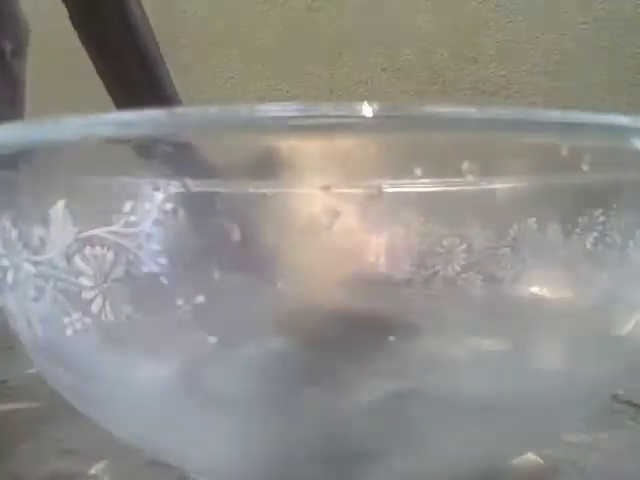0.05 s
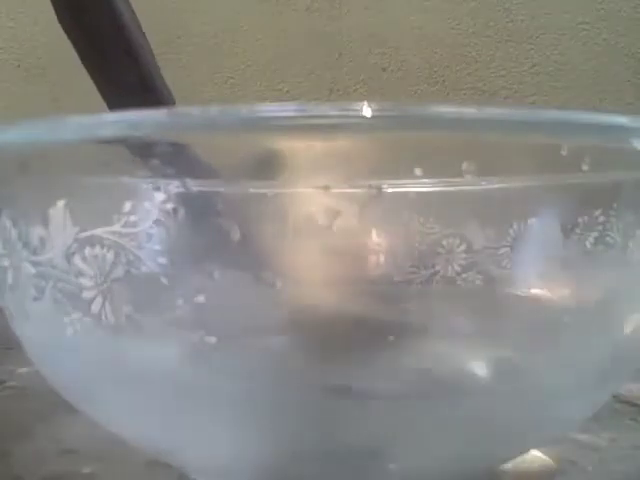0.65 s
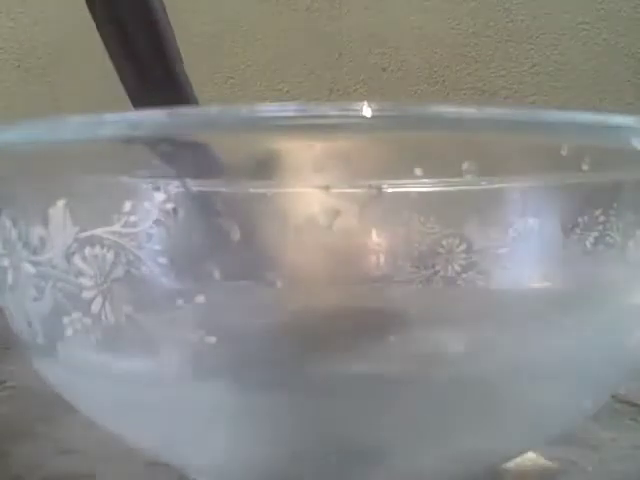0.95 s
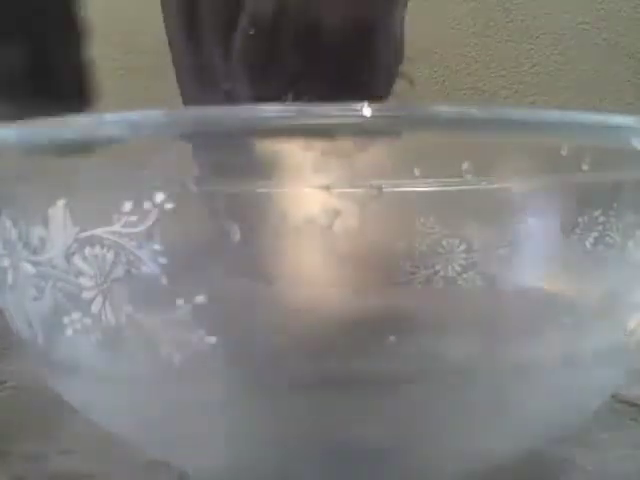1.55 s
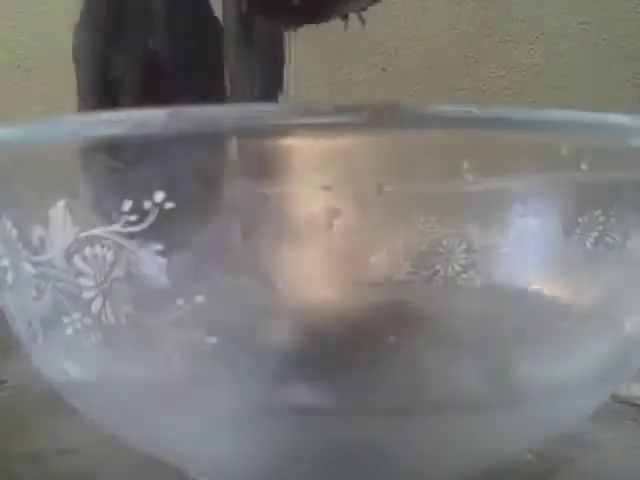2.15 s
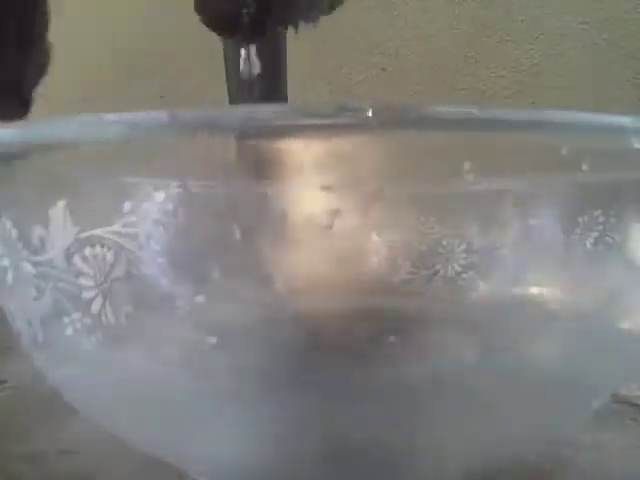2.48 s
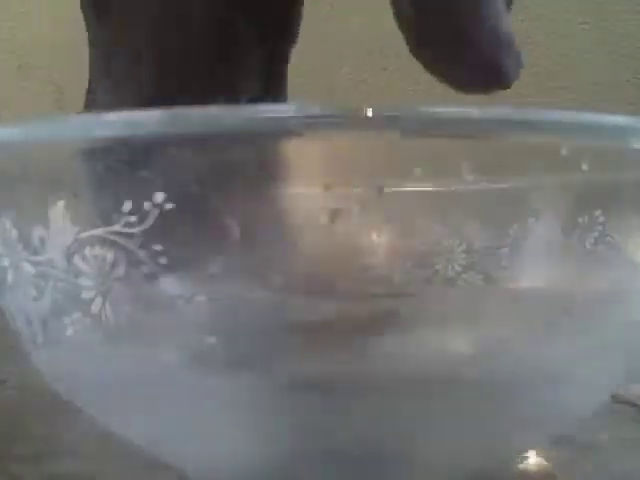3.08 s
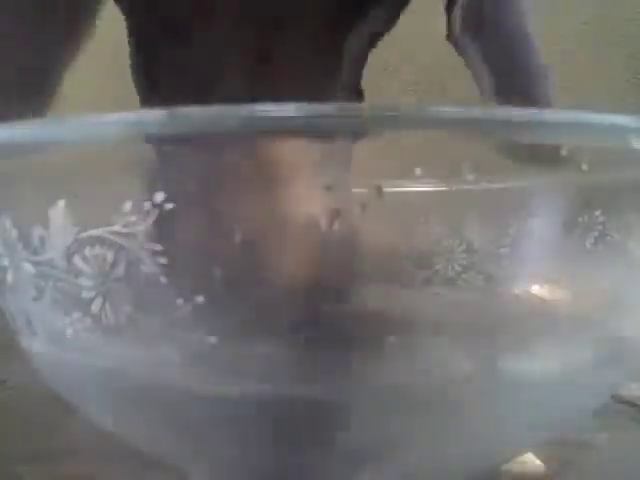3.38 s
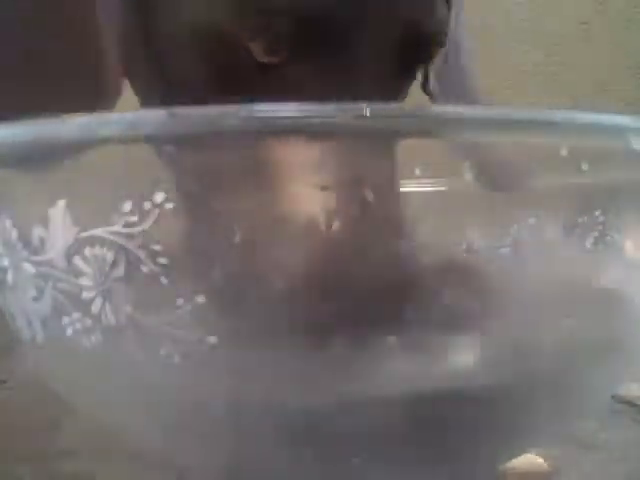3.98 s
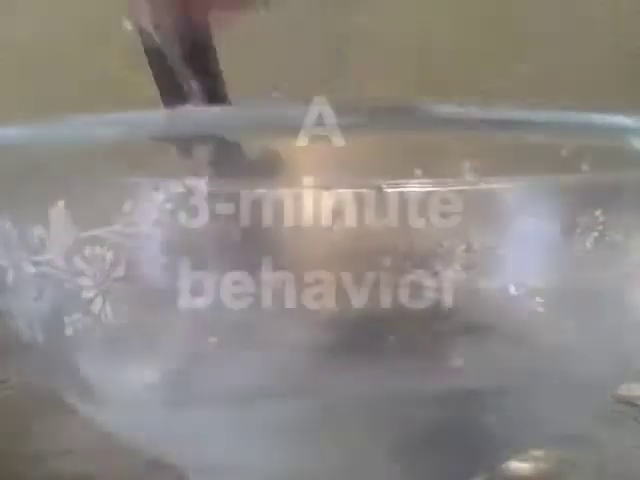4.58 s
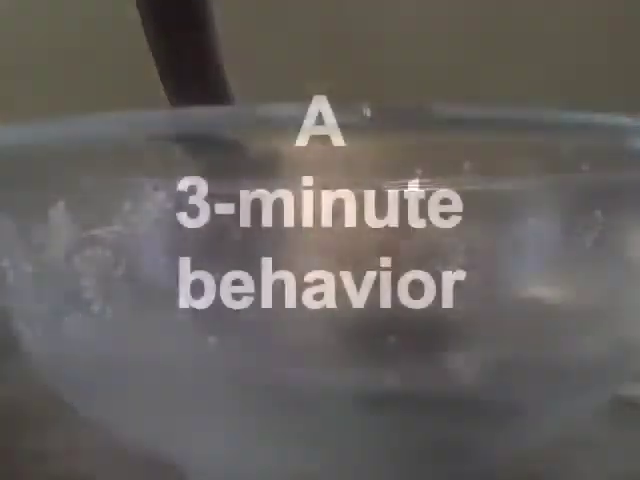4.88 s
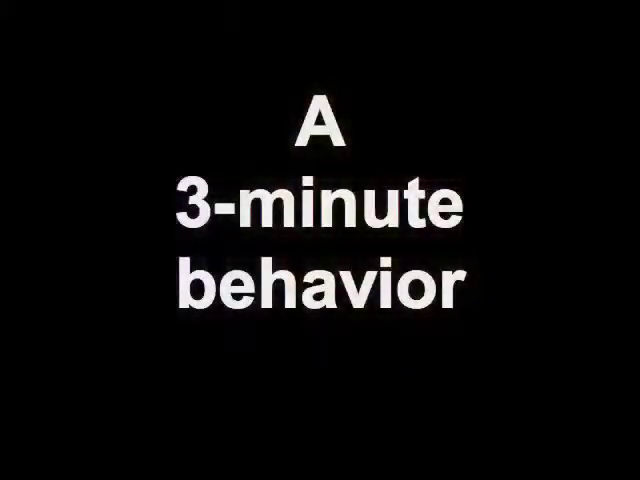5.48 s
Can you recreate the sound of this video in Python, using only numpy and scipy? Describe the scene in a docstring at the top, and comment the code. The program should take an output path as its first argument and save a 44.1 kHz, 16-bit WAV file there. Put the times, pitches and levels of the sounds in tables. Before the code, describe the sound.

A dog blows bubbles and sloshes water in a glass bowl, with knocks and sharp clinks, over a low room hum.

```python
"""Dog at a glass water bowl

A small room, one microphone close to the bowl. A dog dips its muzzle: drips ring as tiny bubbles,
and the water laps and fizzes. It blows a burst of bubbles and knocks the glass, which rings; two
sharp clinks follow. Behind it the room hums and an engine drones far off. All fades out at the end."""
import sys
import numpy as np
from scipy import signal
from scipy.fft import rfft, irfft, next_fast_len
from scipy.io import wavfile
from scipy.ndimage import map_coordinates

SR = 44100
rng = np.random.default_rng(int(sys.argv[2]) if len(sys.argv) > 2 else 0)


def dump(signal):
    """Clip the signal to [-1, 1] and save it as 16-bit WAV at the path in sys.argv[1]."""
    limited = np.clip(np.atleast_2d(signal).T, -1, 1)
    pcm = np.round(limited * 32767).astype(np.int16)
    wavfile.write(sys.argv[1], SR, pcm)


N = 243873
TIME = np.arange(N) / SR
RISE_OCTAVES = 0.069  # upward glide of a small bubble as it rings
KNOCK_OCTAVES = 0.81  # width of the band that a knock excites

# the room's rumble: (frequency [Hz], relative level [dB])
ROOM_SPECTRUM = [(25, -7.5), (45, -1.5), (62, 1.5), (100, -6), (130, -4), (190, -12.5), (290, -20.5),
                 (860, -31), (2200, -40.5), (6500, -48), (9000, -62)]
# the far engine as it reaches the microphone: (time [s], level [dB])
ENGINE_LEVELS = [(.3, -53.5), (1.2, -45.5), (1.7, -50), (2.75, -38), (3.65, -43.5), (3.9, -52), (5, -56.5)]
# the room's reverberation: (frequency [Hz], t60 [s])
WALL_DECAY = [(300, 0.26), (2000, 0.17), (9000, 0.11)]
# water lapping between the dog's moves: (time [s], level [dB])
LAP_LEVELS = [(.45, -60), (.9, -53.5), (1.35, -53), (2.5, -61.5), (3.75, -65.5), (4.6, -62.5), (4.9, -65.5)]
# the dog stirs the water: (time [s], churn [dB], fizz before trim [dB], 20 dB rise [s], 20 dB fall [s])
WATER_STIRS = [(0.178, -38.5, -45.5, 0.06, 0.07), (0.32, -55, -51, 0.28, 0.17),
               (0.675, -48, -57.5, .06, 0.1), (1.0, -54.5, -59, 0.56, 0.5), (1.6, -56, -63, 0.5, 0.42),
               (2.81, -61.5, -60.5, 0.17, 0.17), (4.03, -38.5, -56, 0.0639, 0.05),
               (4.206, -37, -57, .09, 0.13), (4.275, -32, -43, 0.0931, 0.04), (4.46, -60, -53, .35, 0.5),
               (4.66, -52.5, -58, 0.5, 0.4)]
# lapping water: (frequency [Hz], relative level [dB])
LAP_SPECTRUM = [(120, -19.5), (220, 2.5), (600, -6), (1100, -4), (2000, -15), (3500, -26.5), (8000, -53)]
# stirred water, brighter than lapping: (frequency [Hz], relative level [dB])
CHURN_SPECTRUM = [(150, -22.5), (350, -0.5), (740, -1), (2000, -12.5), (8000, -51)]
# the fizz of tiny bubbles: (frequency [Hz], relative level [dB])
FIZZ_SPECTRUM = [(800, -28), (2000, 2.5), (3500, 1), (5200, 0), (7000, -4), (9000, -21)]
# runs of low bubbles: (peak time [s], level [dB], 20 dB fall [s])
BURBLE_RUNS = [(.145, -46.5, .04), (2.06, -46.5, 0.4), (3.97, -47.5, 0.7)]
# sharp contacts: (time [s], level of the first 3 ms [dB], tilt [dB/octave], thud [dB])
CLINK_HITS = [(0.1742, -26.5, -5, -44), (4.0364, -24, -3, -25.5), (4.2503, -23.5, -3, -28),
              (4.4766, -13, 1.4, -25), (4.6850, -11.5, -1, -13)]
# a clink's broad resonances: (frequency [Hz], width [Hz], relative level [dB])
CLINK_RESONANCES = [(720, 780, -15), (1165, 290, -22.5), (1980, 290, -25), (3654, 570, -2.5),
                    (4960, 263, -8.5), (6200, 450, -12), (7235, 400, -10.5)]
# a push through the water: (frequency [Hz], relative level [dB])
THUD_SPECTRUM = [(60, -10), (380, -2), (560, -5.5), (780, 6), (1150, -9), (1450, 5), (2300, 1.5),
                 (2850, -6), (3300, 1.5), (3650, -6), (4400, -21), (8500, -36), (11000, -72.5)]
# ringing bubbles and drips: (time [s], level [dB], pitch [Hz], t60 [s])
BUBBLE_RINGS = [(.1745, -20.5, 3650, 0.022), (0.1821, -23.5, 1000, 0.0087), (0.2127, -26, 1130, 0.015),
                (0.24, -31, 1384, 0.032), (.240, -28.5, 725, 0.039), (1.050, -41.5, 2680, 0.026),
                (2.032, -33.5, 2800, 0.0055), (2.059, -47, 3600, 0.05), (2.834, -29.5, 6070, 0.0067)]
# clusters of tiny bubbles: (time [s], peak [dB], centre pitch [Hz])
SPLASH_CLUSTERS = [(0.31, -36, 4050), (0.97, -41.5, 3630), (0.997, -41.5, 4240), (1.601, -43.5, 4740),
                   (1.619, -39.5, 3340), (1.678, -39.5, 4140), (3.702, -47, 3280), (4.629, -41, 4450)]
# bubbles bursting at the surface: (time [s], peak [dB])
SURFACE_POPS = [(.650, -40.5), (.667, -36.5), (0.779, -39.5), (4.002, -26), (4.018, -24.5), (4.0536, -17.5),
                (4.192, -31.5)]
# knocks on the bowl: (time [s], thud [dB], free ring [dB], pressed ring [dB], band centre [Hz])
BOWL_KNOCKS = [(1.941, -31, -33.5, -27, 5100), (1.948, -31, -28, -31.5, 1870),
               (1.960, -38, -30, -34.5, 4600), (3.807, -26.5, -41.5, -33, 1410),
               (4.032, -20, -32.5, -25, 3300), (4.037, -15, -29, -27, 4120), (4.048, -15, -22, -33, 877)]
# the bowl ringing freely: (frequency [Hz], relative level [dB], t60 [s])
FREE_MODES = [(494, -10, 0.67), (1362, -3.5, 0.79), (2527, -3, 0.39), (3995, -4, .125), (5540, -5, 0.12),
              (7350, -11.5, 0.12)]
# the bowl with the muzzle pressed on it: (frequency [Hz], width [Hz], relative level [dB])
PRESSED_MODES = [(2370, 29, 1.5), (3410, 52, 1.5), (4800, 100, -3.5), (5240, 45, -1), (6744, 47, -3.5),
                 (7403, 80, -6.5)]
# the rim struck by a drop: (frequency [Hz], relative level [dB], t60 [s])
RIM_MODES = [(5000, -3.5, 0.061), (5310, 3, 0.079), (6670, -14.5, 0.05)]
# large bubbles from the nostrils: (peak time [s], peak [dB], pitch [Hz], swell [s])
NOSTRIL_BUBBLES = [(3.815, -36, 370, 0.0065), (4.0, -35, 350, 0.0087), (4.111, -37, 690, 0.0052),
                   (4.2195, -18, 725, 0.0052), (4.2525, -21, 770, 0.0055)]
# air let out against the wall of the bowl: (peak time [s], level [dB])
AIR_PUFFS = [(3.966, -49.5), (4.28, -46.5), (4.919, -63.5)]
# bubbles collapsing on the glass: (time [s], thud [dB], held note [dB], free ring [dB], band centre [Hz])
COLLAPSES = [(4.221, -24.5, -38.5, -47, 1417), (4.235, -20.5, -28.5, -34, 1400),
             (4.2494, -9, -13.5, -27, 1397), (4.2737, -17.5, -12.5, -34, 500),
             (4.292, -18, -25, -27.5, 490), (4.303, -26.5, -41, -44.5, 1414),
             (4.313, -26.5, -43, -28, 2546)]


def amp(db):
    """Decibels to gain."""
    return 10 ** (np.asarray(db) / 20)


def unit(x):
    """Scale to rms 1."""
    return x / np.sqrt(np.mean(x ** 2) + 1e-20)


def crest(x):
    """Scale to peak 1."""
    return x / (np.abs(x).max() + 1e-20)


def dying(t, t60):
    """Exponential decay, 60 dB down after t60."""
    return np.exp(-np.log(1000) * t / t60)


def swell(s, rise_s, fall_s):
    """A gain that peaks at time s, 20 dB down rise_s before and fall_s after."""
    return amp(-20 * np.maximum((s - TIME) / rise_s, (TIME - s) / fall_s))


def along(points, hz):
    """Interpolate (frequency, value) points on a log axis."""
    frequencies, values = np.transpose(points)
    return np.interp(np.log(hz + 1), np.log(frequencies + 1), values)


def envelope(points):
    """One gain per sample from (time, level) points."""
    return amp(np.interp(TIME, *np.transpose(points)))


def wobble(rate):
    """A smooth random curve over the whole scene, rate knots a second."""
    return map_coordinates(rng.standard_normal(int(N * rate / SR) + 4), [TIME * rate])


def unrest(t, rate, knots=400):
    """A jagged random curve over the times t, rate knots a second."""
    return np.interp(t * rate, np.arange(knots), rng.standard_normal(knots))


def tone(hz):
    """A sine that follows a pitch given per sample."""
    return np.sin(2 * np.pi * np.cumsum(hz) / SR)


def add(track, s, sound):
    """Mix a sound into a track at time s."""
    part = track[max(round(s * SR), 0):][:len(sound)]
    part += sound[:len(part)]


def filtered(x, gain):
    """x times a gain that depends on frequency."""
    size = next_fast_len(N + SR // 2)
    return irfft(rfft(x, size) * gain(np.fft.rfftfreq(size, 1 / SR)), size)[:N]


def coloured(x, spectrum):
    """x shaped by a spectrum, at rms 1."""
    return unit(filtered(x, lambda hz: amp(along(spectrum, hz))))


def excited(hz, centre_hz, octaves, skirt_db=-22):
    """How strongly a blow centred on one band drives each frequency."""
    return np.maximum(np.exp(-(np.log2((hz + 1) / centre_hz) / octaves) ** 2), amp(skirt_db))


def far_engine(firing_hz=29.9, second_db=-12, drift_radians=1.1):
    """An engine a long way off drones at its drifting firing rate and the octave above."""
    phase = 2 * np.pi * firing_hz * TIME + drift_radians * wobble(3.1)
    drone = np.sin(phase) + amp(second_db) * np.sin(2 * phase + wobble(2.4))
    return np.sqrt(2) * envelope(ENGINE_LEVELS) * drone


def room_tone(rumble_db=-44.0, hum_db=-49, hum_hz=75.7):
    """Low rumble and a wavering hum all round the microphone."""
    hum_gain = np.sqrt(2) * amp(hum_db + 1.3 * wobble(2.6))
    hum = hum_gain * np.sin(2 * np.pi * hum_hz * TIME + 0.56 * wobble(1.4))
    return hum + amp(rumble_db) * coloured(rng.standard_normal(N), ROOM_SPECTRUM)


def swarm(hz, spread, cycles, uneven_db, count, size=512):
    """Many bubbles of random time, pitch and strength, each gliding up as it dies; rms 1."""
    start = rng.integers(0, N, (count, 1))
    pitch = hz * np.exp(spread * rng.standard_normal((count, 1)))
    strength = amp(uneven_db * np.minimum(rng.exponential(size=(count, 1)), 3))
    turns = pitch * np.arange(size) / SR
    rings = strength * np.sin(2 * np.pi * turns * (1 + turns / cycles / 10)) * dying(turns, cycles)
    return unit(np.bincount((start + np.arange(size)).ravel(), rings.ravel(), N + size)[:N])


def water(lap_fizz_db=-20, fizz_trim_db=-2, wash=0.77):
    """Water laps close by and churns at each stir: large bubbles slosh and tiny ones fizz."""
    lap_gain = envelope(LAP_LEVELS)
    churn_gain, fizz_gain = 0, amp(lap_fizz_db) * lap_gain
    for s, churn_db, fizz_db, rise_s, fall_s in WATER_STIRS:
        stir = swell(s, rise_s, fall_s)
        churn_gain = np.hypot(churn_gain, amp(churn_db) * stir)
        fizz_gain = np.hypot(fizz_gain, amp(fizz_db) * stir)
    large = swarm(hz=790, spread=0.4, cycles=3.7, uneven_db=2.5, count=1800)
    tiny = swarm(hz=4240, spread=0.22, cycles=16, uneven_db=6.5, count=2600, size=128)
    lap = coloured(large + 4 * wash * rng.standard_normal(N), LAP_SPECTRUM)
    stirred = swarm(hz=731, spread=0.4, cycles=11, uneven_db=3.5, count=1500)
    churn = coloured(stirred + wash * rng.standard_normal(N), CHURN_SPECTRUM)
    fizz = coloured(tiny + 1.8 * wash * rng.standard_normal(N), FIZZ_SPECTRUM)
    return lap_gain * lap + churn_gain * churn + amp(fizz_trim_db) * fizz_gain * fizz


def burble(rise_s=0.068):
    """Runs of large, low bubbles roll up round the muzzle."""
    flow = sum(amp(db) * swell(s, rise_s, fall_s) for s, db, fall_s in BURBLE_RUNS)
    return flow * swarm(hz=335, spread=0.14, cycles=13, uneven_db=1.5, count=400, size=1200)


def clinks(rise_s=0.00047, crack_gain=0.065, crack_t60=0.024):
    """Hard, dead contacts: a thud, a crack and broad resonances gone in a few milliseconds."""
    out, t = np.zeros(N), np.arange(SR // 20) / SR
    hz, width, mode_db = np.transpose(CLINK_RESONANCES)[:, :, None]
    sides = (-1) ** np.arange(len(hz))[:, None]  # neighbouring modes swing in opposite directions
    modes = sides * np.exp(-np.pi * width * t) * np.sin(2 * np.pi * hz * t)
    for s, db, tilt_db, thud_db in CLINK_HITS:
        gains = amp(mode_db + tilt_db * np.log2(hz / hz.mean()))
        crack = crack_gain * dying(t, crack_t60) * rng.standard_normal(len(t))
        burst = ((gains * modes).sum(0) + crack) * (1 - np.exp(-(t / rise_s) ** 2))
        add(out, s, amp(db) * burst / burst[t < 0.003].std())
        add(out, s, thud(thud_db, splash=0.017, splash_t60=0.0066))
    return out


def thud(db, splash, splash_t60, dull_above_hz=2520, dulling=0.22, size=2048):
    """A push through the water peaking at db, with a brief splash behind it; the softer, the duller."""
    hz = np.fft.rfftfreq(size, 1 / SR)
    dull_db = dulling * db * np.log2(np.clip(hz / dull_above_hz, 1, 2))
    cepstrum = irfft(np.log(amp(along(THUD_SPECTRUM, hz) + dull_db)))
    fold = np.r_[1, np.full(size // 2 - 1, 2), np.zeros(size // 2)]
    response = np.exp(rfft(cepstrum * fold))  # minimum phase: nothing sounds before the push
    force = splash * rng.standard_normal(size) * dying(np.arange(size) / SR, splash_t60)
    force[0] = 1
    return amp(db) * crest(irfft(response * rfft(force)))


def walls(sound):
    """The small room's near walls answer; the treble dies first."""
    hz, t, noise = signal.stft(rng.standard_normal(SR // 2), SR, nperseg=256)
    tail = signal.istft(noise * dying(t, along(WALL_DECAY, hz)[:, None]), SR, nperseg=256)[1]
    return signal.fftconvolve(sound, tail / np.linalg.norm(tail))[:N]


def bubbles(waver_octaves=0.032, speak_cycles=0.7, tick_db=-9.5, tick_t60=0.026):
    """Trapped bubbles start with a wet tick and ring, gliding and wavering as they change shape."""
    out, t = np.zeros(N), np.arange(SR // 5) / SR
    for s, db, hz, t60 in BUBBLE_RINGS:
        pitch = hz * 2 ** (RISE_OCTAVES * np.minimum(t / t60, 1) + waver_octaves * unrest(t, hz / 5))
        shape = crest(dying(t, t60) * (1 - np.exp(-(hz * t / speak_cycles) ** 2)))
        tick = amp(tick_db) * dying(t, tick_t60) * unrest(t, hz / 2, knots=800)
        add(out, s, amp(db) * (shape + tick) * tone(pitch))
    return out


def splashes(spread=0.17, cycles=30, scatter_s=0.0049, speak_cycles=3.5, count=12):
    """Each little splash is a few tiny bubbles that speak softly and glide up, the later ones weaker."""
    out, t = np.zeros(N), np.arange(SR // 16) / SR
    for s, db, hz in SPLASH_CLUSTERS:
        lateness = np.sort(rng.exponential(size=(count, 1)), axis=0)
        pitch = hz * np.exp(spread * rng.standard_normal((count, 1)))
        turns = pitch * np.maximum(t - scatter_s * lateness, 0)
        shape = np.exp(-lateness / 2) * (1 - np.exp(-(turns / speak_cycles) ** 2)) * dying(turns, cycles)
        glide = 2 ** (RISE_OCTAVES * np.minimum(turns / cycles, 1))
        add(out, s, amp(db) * crest((shape * np.sin(2 * np.pi * turns * glide)).sum(0)))
    return out


def pops():
    """Big bubbles burst dully at the surface."""
    out = np.zeros(N)
    for s, db in SURFACE_POPS:
        add(out, s, thud(db, splash=0.085, splash_t60=0.043))
    return out


def knocks():
    """Each knock thuds through the water, rattles the pressed bowl and leaves it ringing freely."""
    out, t = np.zeros(N), np.arange(SR // 8) / SR
    for s, thud_db, ring_db, pressed_db, centre_hz in BOWL_KNOCKS:
        rattle = pressed_ring(t, centre_hz)
        add(out, s, amp(ring_db) * free_ring(centre_hz, KNOCK_OCTAVES))
        add(out, s, amp(pressed_db) * (rattle + scrape(t, centre_hz)))
        add(out, s, thud(thud_db, splash=0.11, splash_t60=0.013))
    return out


def pressed_ring(t, centre_hz=None, broaden=1, slip_octaves=0.017, slip_rate=300):
    """The pressed bowl's short ring, struck at centre_hz if given; the slipping muzzle shakes its pitch."""
    hz, width, db = np.transpose(PRESSED_MODES)[:, :, None]
    drive = 1 if centre_hz is None else excited(hz, centre_hz, KNOCK_OCTAVES)
    modes = np.array([tone(mode_hz * 2 ** (slip_octaves * unrest(t, slip_rate))) for mode_hz in hz])
    return (drive * amp(db) * np.exp(-np.pi * broaden * width * t) * modes).sum(0)


def free_ring(centre_hz, octaves, waver_octaves=0.0032, waver_rate=25.4):
    """The glass rings on in the modes near the excited band, wavering as the water rocks."""
    t = np.arange(SR) / SR
    hz, mode_db, t60 = np.transpose(FREE_MODES)[:, :, None]
    turns = hz * np.cumsum(2 ** (waver_octaves * unrest(t, waver_rate))) / SR
    sides = (-1) ** np.arange(len(hz))[:, None]
    gains = sides * excited(hz, centre_hz, octaves) * amp(mode_db)
    return (gains * dying(t, t60) * np.sin(2 * np.pi * turns)).sum(0)


def scrape(t, centre_hz, db=-3, t60=0.039, octaves=0.58, grain_db=5):
    """The gritty noise of a contact."""
    grit = rng.standard_normal(len(t)) * amp(grain_db * unrest(t, 810))
    band = excited(np.fft.rfftfreq(len(t), 1 / SR), centre_hz, octaves, skirt_db=-40)
    return amp(db) * unit(irfft(rfft(grit) * band, len(t))) * dying(t, t60)


def plink(s=2.3865, db=-41, tick_db=-14):
    """A drop on the rim: a wet tick and a few close tones that beat."""
    out, t = np.zeros(N), np.arange(SR // 5) / SR
    hz, mode_db, t60 = np.transpose(RIM_MODES)[:, :, None]
    tones = (amp(mode_db) * dying(t, t60) * np.sin(2 * np.pi * hz * t)).sum(0)
    add(out, s, amp(db) * (tones + amp(tick_db) * scrape(t, hz.mean())))
    return out


def nostril_bubbles(waver_octaves=0.031, octaves_per_s=2.4):
    """Large bubbles swell softly from the nostrils, glide up a little and die away."""
    out, t = np.zeros(N), np.arange(SR // 5) / SR
    from_peak = t - t.mean()
    for s, db, hz, swell_s in NOSTRIL_BUBBLES:
        shape = np.exp(-(from_peak / swell_s) ** 2)
        pitch = hz * 2 ** (octaves_per_s * from_peak + waver_octaves * unrest(t, hz / 4))
        add(out, s - t.mean(), amp(db) * shape * tone(pitch))
    return out


def air_puffs(spray_db=-13, tilt_db_per_octave=0.5, drift_octaves=0.018, drift_rate=22):
    """Puffs of air spray and hiss in the pressed bowl's resonances, which drift as the muzzle shifts."""
    ring = pressed_ring(np.arange(SR // 8) / SR, broaden=1.4)
    hiss = unit(signal.fftconvolve(rng.standard_normal(N), ring)[:N])
    drift = 2 ** (drift_octaves * unrest(TIME, drift_rate))
    hiss = np.interp(np.cumsum(drift), np.arange(N), hiss)
    spray = amp(spray_db) * rng.standard_normal(N)
    breath = unit(filtered(hiss + spray, lambda hz: amp(tilt_db_per_octave * np.log2(hz + 1))))
    return breath * sum(amp(db) * swell(s, rise_s=0.11, fall_s=0.15) for s, db in AIR_PUFFS)


def gurgle(held_hz=2540, held_t60=0.14, choke_t60=0.0065, jolt_db=6.5, jolt_t60=0.045, overtones_db=-12.5):
    """Large bubbles collapse on the glass; each restarts the bowl's held note and chokes the last."""
    out, t = np.zeros(N), np.arange(SR // 4) / SR
    overtones = amp(overtones_db) * pressed_ring(t, centre_hz=5200)
    note = np.sin(2 * np.pi * held_hz * t) * (1 - np.exp(-held_hz * t))  # muzzle resting on the bowl
    next_times = [row[0] for row in COLLAPSES[1:]] + [np.inf]
    for (s, thud_db, note_db, ring_db, centre_hz), next_s in zip(COLLAPSES, next_times):
        held = amp(note_db) * dying(t, held_t60) * dying(np.maximum(s + t - next_s, 0), choke_t60)
        jolt = amp(2 * thud_db + jolt_db)  # a collapse overdrives the note by the square of its force
        add(out, s, (held + jolt * dying(t, jolt_t60)) * note + jolt * overtones)
        add(out, s, amp(thud_db) * air_pocket(t))
        add(out, s, amp(ring_db) * free_ring(centre_hz, octaves=0.35))
        add(out, s, thud(thud_db, splash=0.11, splash_t60=0.05))
    return out


def air_pocket(t, hz=730, t60=0.051, relative_db=-15.5, waver_octaves=0.083):
    """The air under the muzzle rings briefly at an unsteady pitch."""
    return amp(relative_db) * dying(t, t60) * tone(hz * 2 ** (waver_octaves * unrest(t, 60)))


def scene(walls_db=-18):
    """The bowl right at the microphone, the walls faint behind it, the engine far off."""
    bowl = knocks() + gurgle() + clinks() + pops() + bubbles() + nostril_bubbles() + splashes() + plink()
    reflections = amp(walls_db) * walls(bowl)
    water_and_breath = water() + burble() + air_puffs()
    return (bowl + reflections + water_and_breath + far_engine() + room_tone())[None]


def record(dry, fade_start_s=4.32, silent_s=5.473, top_hz=8500):
    """One microphone channel, with a straight fade to silence and a steep treble cut."""
    fade = np.interp(TIME, (fade_start_s, silent_s), (1, 0))
    return filtered(dry[0] * fade, lambda hz: 1 / np.sqrt(1 + (hz / top_hz) ** 100))[None]


dry = scene()
out = record(dry)
dump(out)
```